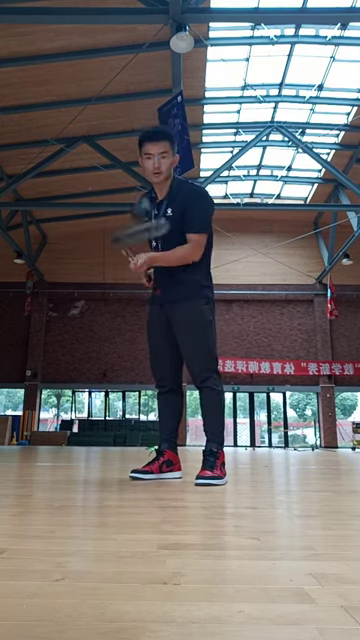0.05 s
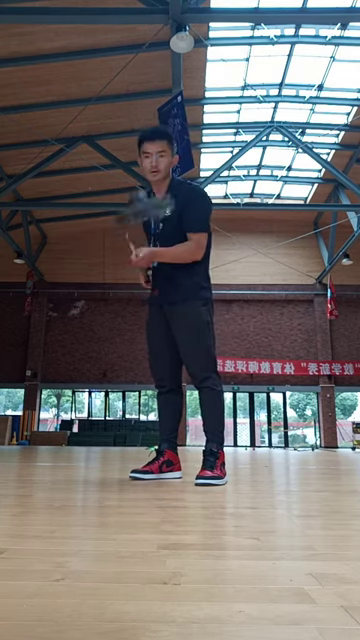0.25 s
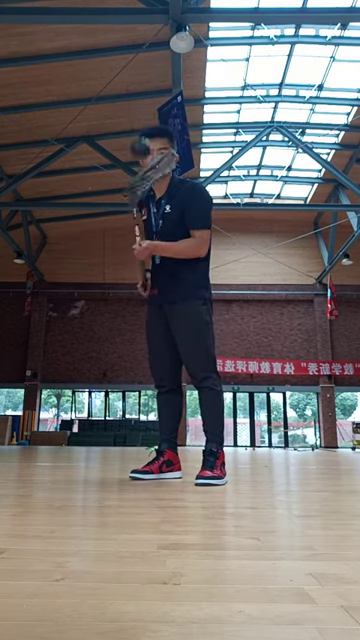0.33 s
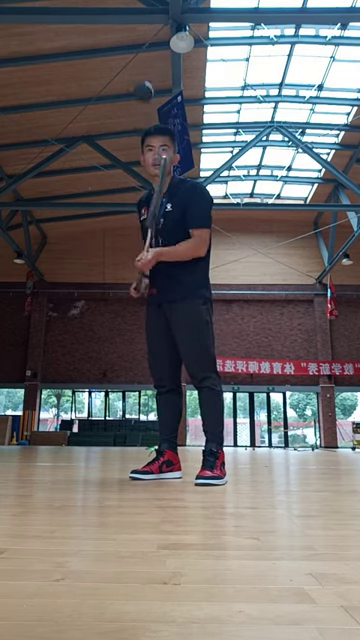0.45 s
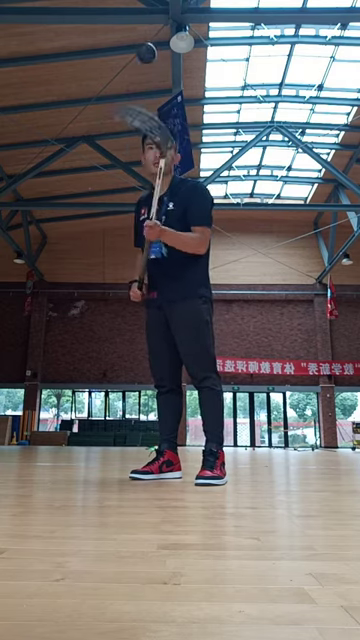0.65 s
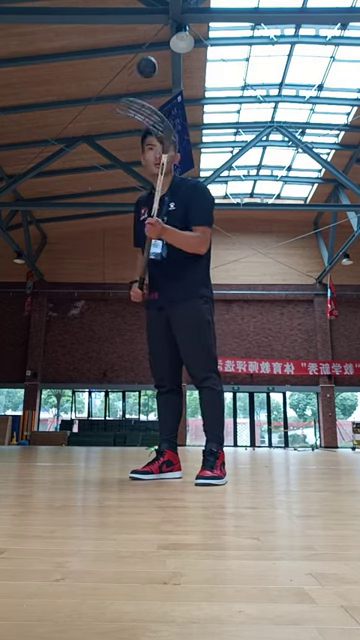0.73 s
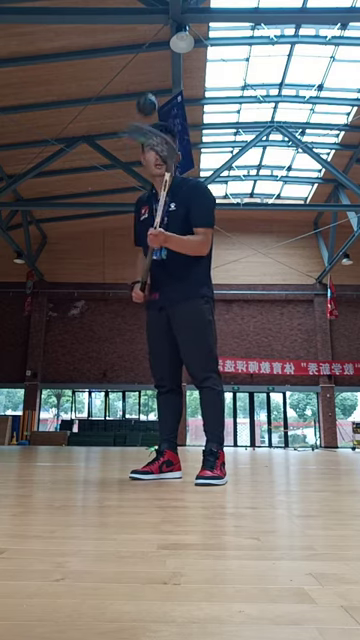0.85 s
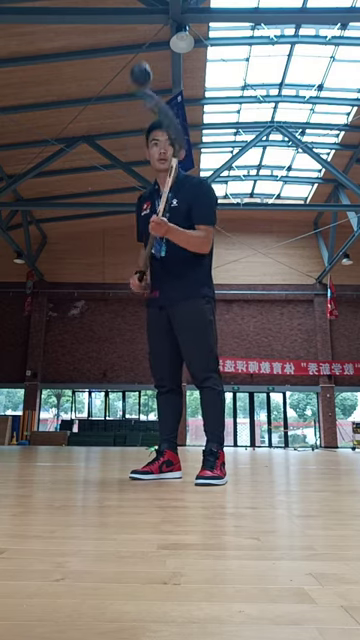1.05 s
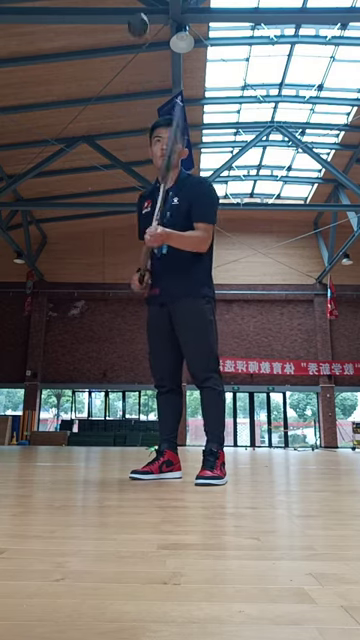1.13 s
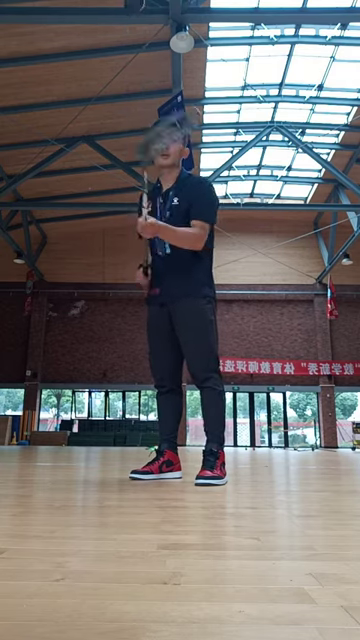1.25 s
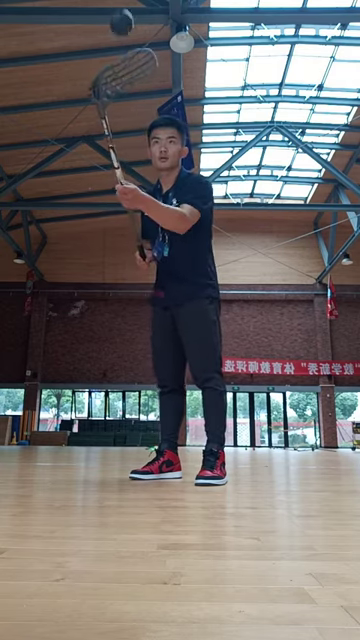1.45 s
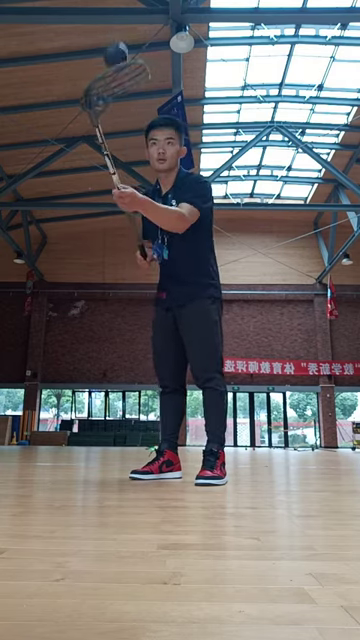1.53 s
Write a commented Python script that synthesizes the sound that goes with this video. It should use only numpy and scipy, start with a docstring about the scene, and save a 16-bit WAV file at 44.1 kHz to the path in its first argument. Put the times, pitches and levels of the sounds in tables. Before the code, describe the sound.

A stick blade juggles a hollow plastic ball: two sharp clacks, each with quick rebounds, and faint stick ticks before each. Heard from nearby, they echo through a large, empty sports hall over a low, steady rumble.

```python
"""A large, empty sports hall: low, steady rumble, and the fading ring of an earlier tap.
A stick ticks faintly in the hands, then its blade taps a hollow plastic floorball, juggling it.
The tap is a sharp clack and two quick rebounds; blade and ball ring for a few hundredths of a second.
Floor and walls throw the clack back, and the hall rings on.
Three more ticks, then a second tap, on a springier spot of the blade."""
import sys
import numpy as np
from scipy import signal
from scipy.fft import rfft, irfft
from scipy.io import wavfile

SR = 44100
rng = np.random.default_rng(int(sys.argv[2]) if len(sys.argv) > 2 else 0)


def dump(signal):
    """Clip the signal to [-1, 1] and save it as 16-bit WAV at the path in sys.argv[1]."""
    limited = np.clip(np.atleast_2d(signal).T, -1, 1)
    pcm = np.round(limited * 32767).astype(np.int16)
    wavfile.write(sys.argv[1], SR, pcm)


N = 70560


def from_db(db):
    """Decibels to gain."""
    return 10 ** (np.asarray(db) / 20)


def at_hz(points, hz, column=1):
    """Table column, interpolated over log frequency."""
    table = np.array(points)
    return np.interp(np.log(np.maximum(hz, 1)), np.log(table[:, 0]), table[:, column])


def pan(db):
    """Left and right gains for an L-R level difference."""
    return from_db(np.array([[.5], [-.5]]) * db)


def shifted(x, start_s):
    """Stereo sound placed in a full-length track; a negative start drops its head."""
    start = int(round(start_s * SR))
    skip = max(-start, 0)
    return np.pad(x, ((0, 0), (max(start, 0), N)))[:, skip:skip + N]


def envelope(t, rise_s, t60_s):
    """Quick rise, exponential decay."""
    return (1 - np.exp(-t / rise_s)) * np.exp(-np.log(1000) * t / t60_s)


# Left-right coherence: f/Hz, correlation
COHERENCE = [(60, 0.93), (200, 0.98), (400, .93), (700, 0.62), (1200, 0), (2400, 0.16), (5000, 0)]

def noise(spectrum, size):
    """Stereo noise of given spectral density, coherent in the bass only."""
    hz = np.arange(size // 2 + 1) * SR / size
    mid, side = rfft(rng.standard_normal((2, size)))
    coherence = at_hz(COHERENCE, hz)
    pair = np.sqrt(1 + coherence) * mid + np.sqrt(1 - coherence) * side * [[1], [-1]]
    return irfft(pair * from_db(at_hz(spectrum, hz)) * np.sqrt(SR) / 2, size)


def burst(spectrum, t, rise_s, t60_s, pan_db=2):
    """Decaying stereo noise burst."""
    return noise(spectrum, len(t)) * envelope(t, rise_s, t60_s) * pan(pan_db)


# Microphone colour: f/Hz, L-R/dB
MIC_BALANCE = [(80, -0.1), (300, 1), (700, 3), (1500, 0.3), (2400, 1), (4400, 3), (6300, 8), (7800, -5),
               (14000, 2.5)]

def room_noise(spectrum, size):
    """Diffuse noise, coloured by the microphones: brighter left near 6.3 kHz, right near 7.8 kHz."""
    hz = np.arange(size // 2 + 1) * SR / size
    return irfft(rfft(noise(spectrum, size)) * pan(at_hz(MIC_BALANCE, hz)), size)


# Room noise: f/Hz, density/(dB per Hz)
RUMBLE_SPECTRUM = [(15, -77), (30, -80.5), (50, -76), (90, -78.5), (135, -79), (200, -82), (350, -88),
                   (600, -94), (1000, -100), (1500, -107), (2300, -107), (4000, -110), (7000, -112),
                   (9500, -118), (15000, -118)]

def rumble():
    """Low, steady noise of the hall."""
    return room_noise(RUMBLE_SPECTRUM, N)


# Reverberation: f/Hz, initial density/(dB per Hz), T60/s
HALL_DECAY = [(253, -93, 4.3), (606, -88.5, 2.4), (930, -92, 3.14), (1450, -97.5, 3.02), (1940, -92.5, 3.6),
              (2410, -87.5, 3.23), (2500, -94, 2.5), (2870, -91, 2.73), (3900, -92.5, 2.02),
              (6660, -88, 2.05), (6930, -97, 1.61), (7630, -89, 1.68), (10220, -104, 0.97),
              (14400, -106, 0.6)]

def hall_tail(treble_above_hz=3800, clump_db=0.28, clump_s=0.0052):
    """Diffuse ring after one clack, as body and treble; the treble dies first."""
    size = 2 * N
    t, hz = np.arange(size) / SR, np.arange(N + 1) * SR / size
    spectrum, out = rfft(room_noise(HALL_DECAY, size)), np.zeros((2, 2, size))
    edges_hz = np.geomspace(300, 17000, 12)
    for low, high in zip(edges_hz, edges_hz[1:]):
        centre_hz = np.sqrt(low * high)
        band = irfft(spectrum * ((hz >= low) & (hz < high)), size)
        decay = envelope(t, rise_s=0.037, t60_s=at_hz(HALL_DECAY, centre_hz, column=2))
        out[int(centre_hz > treble_above_hz)] += band * decay
    # late reflections arrive in clumps
    clumps = np.interp(t / clump_s, np.arange(1000), rng.standard_normal(1000))
    return out * from_db(clump_db * clumps)


def hall(delay_s=.008, springy_body_db=2.5, springy_treble_db=-2):
    """Each contact feeds the hall by its strength; the springy spot sends a duller sound."""
    body, treble = hall_tail()
    earlier_tap = (-0.79, 0.5, .5)  # t/s, level/dB, spot
    out = 0
    for start_s, db, spot, *_ in [earlier_tap, *BLADE_CONTACTS]:
        tail = from_db(spot * springy_body_db) * body + from_db(spot * springy_treble_db) * treble
        out += shifted(from_db(db) * tail, start_s + delay_s)
    return out


# Stick tick: f/Hz, initial density/(dB per Hz)
TICK_SPECTRUM = [(400, -91), (750, -93), (1300, -101), (2250, -86.5), (3000, -96), (4000, -96), (7500, -94),
                 (10000, -108), (15000, -108)]
# Ticks: t/s, level/dB
STICK_TICKS = [(0.1468, 4.5), (0.695, 2), (0.7067, 4.5), (0.7189, 2)]

def ticks():
    """Faint, dry noises of the stick in the hands."""
    t, out = np.arange(SR // 10) / SR, 0
    for start_s, db in STICK_TICKS:
        out += shifted(from_db(db) * burst(TICK_SPECTRUM, t, rise_s=0.00035, t60_s=0.024), start_s)
    return out


# Contact crack: f/Hz, initial density/(dB per Hz)
CRACK_SPECTRUM = [(200, -91), (600, -61.5), (1400, -68.5), (2200, -68.5), (4000, -60.5), (6500, -62),
                  (8000, -62), (10000, -74.5), (12500, -75), (15000, -74)]

def crack(t):
    """Dense snap of plastic on plastic."""
    return burst(CRACK_SPECTRUM, t, rise_s=0.00073, t60_s=0.016)


# Blade and ball modes: f/Hz, stiff-spot level/dB, springy-spot level/dB, T60/s, L-R/dB
BLADE_MODES = [(251, -56, -50.5, 0.062, -2), (378, -51, -44, 0.079, 2), (456, -61, -50.5, 0.064, -14),
               (574, -44, -49.5, 0.061, 2), (703, -37.5, -52, 0.053, 3), (849, -42, -42.5, 0.045, -2),
               (1018, -42, -43, 0.038, -1), (1146, -38, -41, 0.017, 12), (1550, -59, -41.5, 0.029, -9.5),
               (2072, -28.5, -40, 0.022, -3), (2390, -29.5, -49, .02, 3), (2923, -41.5, -36, .023, 14.5),
               (3600, -28, -49, 0.011, 16.5)]
BALL_MODES = [(4760, -30.5, -30.5, 0.017, 7), (5410, -52, -27, 0.015, 18), (5800, -38, -23, 0.0089, 19),
              (6200, -27, -42, .026, 13.5), (6766, -20.5, -29, 0.012, 11.5), (6807, -19, -45, 0.0099, 14),
              (7726, -19.5, -28, 0.012, -4.5), (8650, -31, -26.5, 0.01, 3.5), (9730, -45.5, -44, 0.03, -9)]

def ring(modes, spot, t, rise_s, upper_db=0, upper_above_hz=1800):
    """Damped modes, weighted by where the ball lands; no two contacts are quite alike."""
    out = 0
    for k, (hz, stiff_db, springy_db, t60_s, pan_db) in enumerate(modes):
        scatter_db, detune = rng.normal(0, 1.0), rng.normal(0, 0.011)
        db = stiff_db + spot * (springy_db - stiff_db) + scatter_db + upper_db * (hz > upper_above_hz)
        stereo_phase_rad = 1.45 * min(hz / 1140, 1) * np.array([[-.5], [.5]])  # wider in the treble
        wave = np.sin(2 * np.pi * hz * (1 + detune) * t + stereo_phase_rad)
        out += (-1) ** k * from_db(db) * pan(pan_db) * envelope(t, rise_s, t60_s) * wave
    return out


# Stick rattle: f/Hz, initial density/(dB per Hz)
RATTLE_SPECTRUM = [(200, -76.5), (400, -74), (800, -70.5), (1400, -75.5), (2200, -73), (4000, -76.5),
                   (6500, -73.5), (8200, -76), (10000, -92.5), (15000, -103)]

def rattle(spot, t, springy_db=2.5):
    """Stick rattle and nearby scatter: a rough tail joining the contacts of one tap."""
    return from_db(spot * springy_db) * burst(RATTLE_SPECTRUM, t, rise_s=0.001, t60_s=0.067)


# Ball meets blade: t/s, level/dB, spot (0 stiff, 1 springy), crack/dB, blade ring/dB,
# upper blade modes/dB, ball ring/dB, L-R/dB, wall slap/dB
BLADE_CONTACTS = [(0.2003, 1.5, 0.026, -3, 0.5, -0.5, -1, 0, -9.5),
                  (0.2332, -10.5, 0, 2.5, -3.5, 2, 4, -0.5, -8), (0.2432, -25, 0, 11, 1, 2, -2, 2, -8),
                  (1.0165, -3.5, 0.9, -2, 6.5, 1, -1.5, 0.5, 0.5),
                  (1.0408, -7.5, 0.86, 0.5, 5, -19, 1.5, 1, 0),
                  (1.055, -10.5, 0.97, -4, 5, -21, -5.5, 4, -3.5)]

def clacks():
    """Each contact cracks, rings blade and ball, and rattles the stick."""
    t, out = np.arange(SR // 10) / SR, 0
    for start_s, db, spot, crack_db, blade_db, upper_db, ball_db, pan_db, _ in BLADE_CONTACTS:
        blade = from_db(blade_db) * ring(BLADE_MODES, spot, t, rise_s=0.001, upper_db=upper_db)
        ball = from_db(ball_db) * ring(BALL_MODES, spot, t, rise_s=0.00054)
        clack = from_db(crack_db) * crack(t) + blade + ball + rattle(spot, t)
        out += shifted(from_db(db) * pan(pan_db) * clack, start_s)
    return out


# Wall echoes: delay/s, clack level/dB, slap level/dB
WALL_ECHOES = [(.0568, -21, -1), (.0632, -24, -5.5), (.072, -24.5, -16), (.125, -45, -17), (.180, -31, -28)]

def reflections(direct, floor_delay_s=.0035, floor_db=-18):
    """The clack bounces off the floor, then the walls."""
    floor = from_db(floor_db) * shifted(direct, floor_delay_s)
    walls = sum(from_db(db) * shifted(direct, delay_s) for delay_s, db, _ in WALL_ECHOES)
    return floor + walls


# Hollow wall slap: f/Hz, initial density/(dB per Hz)
SLAP_SPECTRUM = [(1000, -100), (1650, -74), (2000, -58), (2400, -59), (2800, -84), (4000, -100)]

def wall_slaps():
    """The clack's hollow note carries best to the walls and returns as short, rough knocks."""
    t, out = np.arange(SR // 20) / SR, 0
    for start_s, db, *_, wall_db in BLADE_CONTACTS:
        slap = burst(SLAP_SPECTRUM, t, rise_s=0.0012, t60_s=0.022, pan_db=3)
        for delay_s, _, slap_db in WALL_ECHOES:
            out += shifted(from_db(db + wall_db + slap_db) * slap, start_s + delay_s)
    return out


def scene():
    """Stereo sum of hall, stick, ball and echoes."""
    direct = clacks()
    return rumble() + hall() + ticks() + direct + reflections(direct) + wall_slaps()


def record(dry):
    """Steep elliptic low-pass."""
    cutoff_hz = 15750
    return signal.sosfilt(signal.ellip(10, .1, 70, cutoff_hz, fs=SR, output="sos"), dry)


dry = scene()
out = record(dry)
dump(out)
```